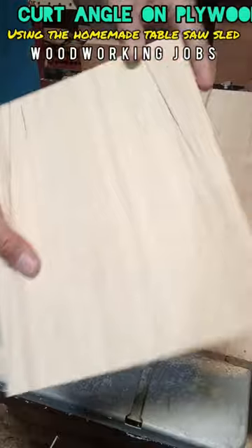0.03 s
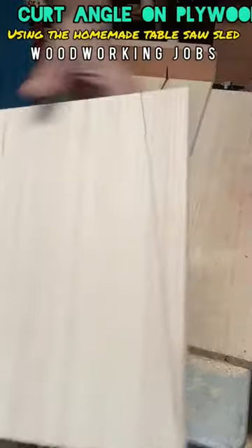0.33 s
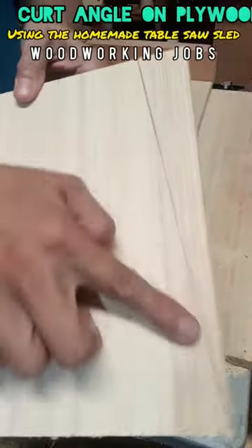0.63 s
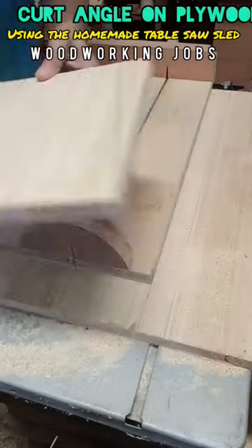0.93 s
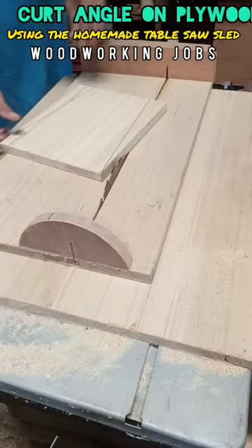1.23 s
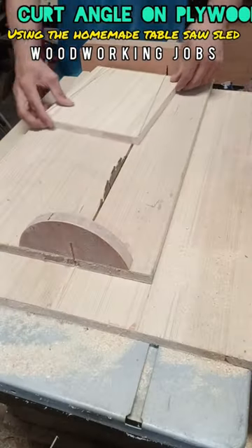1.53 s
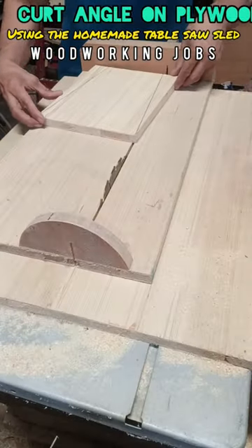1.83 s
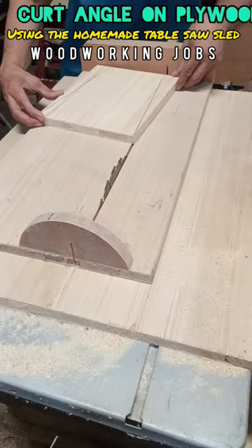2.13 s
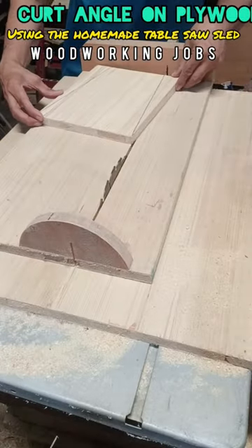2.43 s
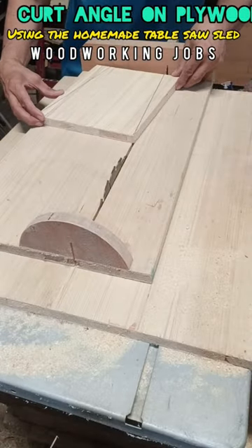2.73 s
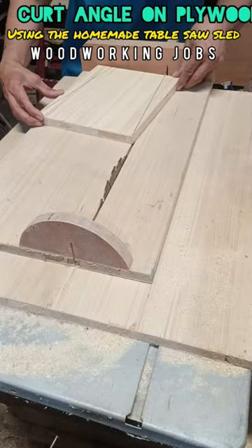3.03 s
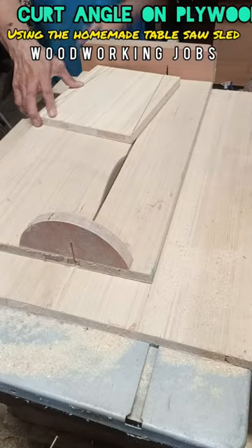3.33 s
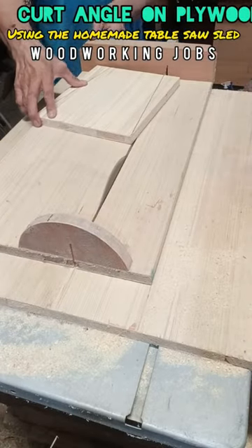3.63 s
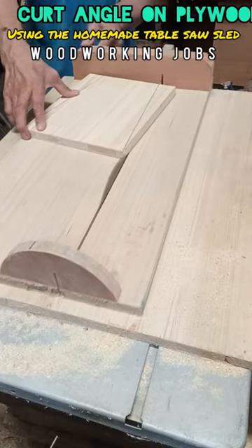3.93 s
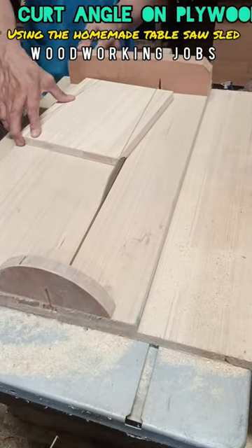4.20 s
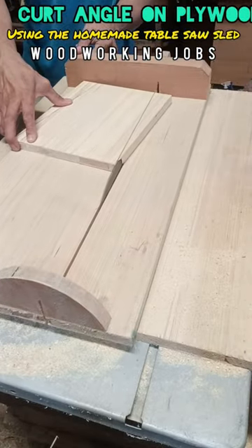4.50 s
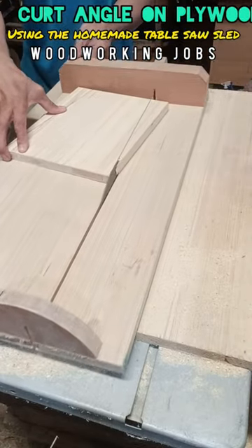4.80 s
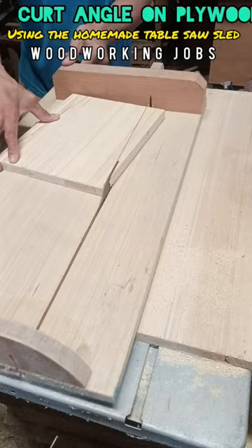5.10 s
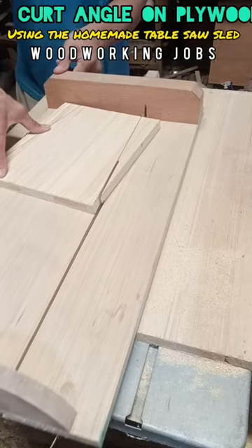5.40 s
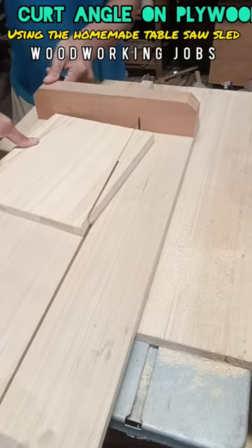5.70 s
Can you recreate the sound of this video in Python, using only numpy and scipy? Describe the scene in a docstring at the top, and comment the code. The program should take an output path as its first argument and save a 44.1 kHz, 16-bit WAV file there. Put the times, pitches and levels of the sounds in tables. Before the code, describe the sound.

A muffled engine hums beyond the walls of a small workshop as a board is laid down and slid about with quiet knocks, rubs and ticks. Then a table saw clicks on close to the microphone, much louder, with a rising whine and a rush of air. The teeth rasp and scream through the plywood, the steel blade rings, and the pitch sags slightly as the cut deepens.

```python
"""A table saw starts at 3.4 s in a small workshop and cuts a plywood board.
Fan and blade roar up to speed; the 24 teeth whine and rasp in the wood, the steel plate rings,
and the deepening cut slows the blade a little. Before that, the board is laid on the saw's wooden
sled and slid into place with knocks, rubs and ticks, while an engine outside drones away."""
import sys
import numpy as np
from scipy import signal
from scipy.fft import rfft, irfft, next_fast_len
from scipy.io import wavfile
from scipy.ndimage import map_coordinates

SR = 44100
rng = np.random.default_rng(int(sys.argv[2]) if len(sys.argv) > 2 else 0)


def file_out(sig):
    """Save sig as 16-bit WAV at sys.argv[1]."""
    # one column per channel
    cols = np.atleast_2d(sig).T
    # limit, then scale
    lim = np.clip(cols, -1, 1)
    pcm = np.round(lim * 32767).astype(np.int16)
    wavfile.write(sys.argv[1], SR, pcm)


N = 262395
TIME = np.arange(N) / SR
TEETH, FREE_TOOTH_HZ = 24, 1975.4
MOTOR_ON_S, SAG_FROM_S = 3.398, 4.71

# mid-band noise of sliding wood and still air: f/Hz, density/dB
MID_NOISE = [(250, -10), (450, 2), (700, -0.5), (1000, 2), (1400, 1.5), (2000, -3.5), (2700, -7.5),
             (3400, -12.5), (5000, -11.5), (7000, -28), (10000, -58)]
# treble hiss: f/Hz, density/dB
HISS = [(2350, -51), (4000, -2.5), (6740, -2.5), (8500, 3.5), (9790, -5.5), (10800, -10), (12600, -12),
        (15500, -15)]


def amp(db):
    """Decibels to gain."""
    return 10 ** (np.asarray(db) / 20)


def unit(x):
    """Scale to rms 1."""
    return x / np.sqrt(np.mean(x ** 2) + 1e-20)


def along(points, hz):
    """Interpolate (f/Hz, value) points on a log axis."""
    f, v = np.transpose(points)
    return np.interp(np.log(hz + 1), np.log(f + 1), v)


def curves(rows):
    """One value per sample for each column after t/s."""
    s, *cols = np.transpose(rows)
    return [np.interp(TIME, s, c) for c in cols]


def wobble(rate_hz):
    """Smooth random curve with knots at rate_hz."""
    return map_coordinates(rng.standard_normal(int(N * rate_hz / SR) + 4), [TIME * rate_hz])


def ramp(start_s, rise_s):
    """Linear rise from 0 to 1."""
    return np.clip((TIME - start_s) / rise_s, 0, 1)


def swell(centre_s, sigma_s):
    """Gaussian rise and fall."""
    return np.exp(-.5 * ((TIME - centre_s) / sigma_s) ** 2)


def filtered(x, response):
    """Apply a gain given as a function of frequency."""
    m = next_fast_len(N + 8192)
    return irfft(rfft(x, m) * response(np.fft.rfftfreq(m, 1 / SR)), m)[..., :N]


def rush(spectrum):
    """Stereo noise of rms 1, nearly mono in the bass."""
    # left-right likeness: f/Hz, correlation
    likeness = [(40, 0.54), (120, 1), (260, 0.86), (500, 0.77), (1000, 0.42), (2000, 0.014), (4000, 0.017),
                (8000, 0.4), (12000, 0.84)]

    def mid_side_gain(hz):
        angle = np.arccos(np.clip(along(likeness, hz), -1, 1)) / 2
        return amp(along(spectrum, hz)) * [np.cos(angle), np.sin(angle)]

    mid, side = filtered(rng.standard_normal((2, N)), mid_side_gain)
    return unit(np.array([mid + side, mid - side]))


def smear(phase, width_hz):
    """Narrow stereo noise of rms 1 riding on a pitch."""
    lowpass = signal.butter(2, width_hz / 2, fs=SR)
    a, b = signal.lfilter(*lowpass, rng.standard_normal((2, 2, N)))
    return unit(a * np.cos(phase) + b * np.sin(phase))


def tone(phase, waver_db, spread_rad, lead_rad=0):
    """Stereo sine of rms 1; reflections make level and phase wander on each side."""
    shared_db = waver_db * wobble(22)
    sides = [amp(shared_db + waver_db * wobble(6.5)) * np.sin(phase + shift + spread_rad * wobble(5.085))
             for shift in (lead_rad, 0)]
    return unit(np.array(sides))


def rough_tone(phase, share, lead_rad=0):
    """Tone with a share of its power scattered into narrow noise."""
    clean = tone(phase, waver_db=.8, spread_rad=.25, lead_rad=lead_rad)
    return np.sqrt(1 - share) * clean + np.sqrt(share) * smear(phase, width_hz=38)


def ambience():
    """Steady workshop rumble under faint, fading air and hiss."""
    # room rumble: f/Hz, density/dB
    room = [(20, -7), (32, -10), (45, 5), (70, -1), (130, 1), (250, -12.5), (600, -18.5), (2000, -89)]
    air = amp(-53.5 - 1.25 * TIME) * rush(MID_NOISE)
    hiss = amp(-66.5 - 2 * TIME) * rush(HISS)
    return air + hiss + amp(-50) * rush(room)


def engine(fade_db_per_s=7):
    """An engine drones through the walls and fades as it gathers speed."""
    # firing rate: t/s, f/Hz
    firing = [(0.1, 37.2), (0.8, 37.7), (1.5, 38.5), (2.3, 39.3), (2.6, 40), (2.8, 41.3), (3.05, 42),
              (3.4, 44.5)]
    # drone: multiple of firing rate, relative level/dB
    orders = [(4, -1), (6, 1.5), (7, -3), (8, -6), (9, -7), (10, -1), (11, -6.5)]
    # single orders booming in the room: t/s, sigma/s, multiple, level/dB
    room_booms = [(0.277, 0.15, 3, -34.5), (0.73, 0.085, 3, -35.5), (0.517, 0.07, 4, -45),
                  (0.888, 0.14, 4, -37), (1.346, 0.17, 6, -46), (0.992, 0.079, 8, -45),
                  (1.44, 0.15, 9, -47.5), (1.887, 0.06, 6, -46.5), (2.642, 0.083, 8, -50),
                  (2.95, 0.087, 7, -50.5), (3.0, 0.18, 4, -54)]
    # rumble through the walls: f/Hz, density/dB
    rumble = [(25, -39), (60, -13), (105, -8), (150, 1.5), (195, -7), (230, -9), (340, -6.5), (400, -12.5),
              (480, -21), (700, -24), (2000, -68)]
    firing_hz, = curves(firing)
    phase = 2 * np.pi * np.cumsum(firing_hz) / SR
    drone = sum(amp(db) * tone(k * phase + 0.54 * wobble(7.35), waver_db=3.5, spread_rad=0.086)
                for k, db in orders)
    booms = sum(amp(db) * swell(s, sigma) * np.sin(k * phase) for s, sigma, k, db in room_booms)
    return amp(-35 - fade_db_per_s * TIME) * (amp(0.5) * rush(rumble) + amp(-10) * drone) + booms


def rubbing():
    """Hands and board rub on the sled: low drag, woody scrape and hiss."""
    # strokes: t/s, sigma/s, drag/dB, scrape/dB, hiss/dB
    rubs = [(0.093, 0.12, -32.5, -50, -63), (0.54, 0.17, -52, -64, -74), (0.848, 0.026, -42, -66, -60),
            (1.5, 0.093, -44, -51.5, -64), (1.762, 0.12, -46, -51.5, -67.5)]
    # low drag: f/Hz, density/dB
    drag_spectrum = [(30, -39), (75, -13), (110, -4.5), (160, -1), (200, -15), (330, -6), (420, -18),
                     (520, -31), (2000, -78)]
    drag, scrape, hiss = rush(drag_spectrum), rush(MID_NOISE), rush(HISS)
    return sum(swell(s, sigma) * (amp(drag_db) * drag + amp(scrape_db) * scrape + amp(hiss_db) * hiss)
               for s, sigma, drag_db, scrape_db, hiss_db in rubs)


def sled_bumps(rise_s=0.0077):
    """Soft pushes set the sled's lowest mode swinging."""
    # pushes: t/s, gain/dB, f/Hz
    pushes = [(1.699, -20.5, 130), (1.741, -19.5, 120), (1.786, -18, 120), (2.07, -26, 112)]
    out = np.zeros(N)
    for s, db, hz in pushes:
        t = np.maximum(TIME - s, 0)
        out += amp(db) * (t / rise_s) ** 2 * np.exp(-t / rise_s) * np.sin(2 * np.pi * hz * t)
    return out


def ticks():
    """Tiny hard contacts of board and power switch: a tap with a short bright edge."""
    # contacts: t/s, relative level/dB, edge re tap/dB
    contacts = [(0.543, -27, -25), (2.196, -23.5, -7), (2.945, -36, -8), (3.399, -8.5, -22)]
    tap = rush([(400, -7), (1500, 2), (2400, -3), (3500, -12), (7000, -23), (15000, -38)])
    edge = rush([(7500, -30), (9700, 4), (11500, 2), (13000, -9), (15500, -12)])
    fade = lambda s, t60_s: amp(-60 * np.abs(TIME - s) / t60_s) * (TIME >= s)
    return sum(amp(db - 14.5) * (fade(s, 0.027) * tap + amp(edge_db) * fade(s, 0.016) * edge)
               for s, db, edge_db in contacts)


def board_landing(damping=2.15):
    """The hand-damped board lands edge by edge; each knock clatters and rings its modes."""
    # landings: t/s, relative level/dB, low-mode gain/dB, high-mode gain/dB, contact/s
    knocks = [(1.159, -21, -22, 11, 0.004), (1.166, -15.5, 5.5, -10, 0.00587),
              (1.209, -19.5, -17, -8, 0.0069), (1.221, -22, -14, 2, 0.007)]
    # board modes: f/Hz, relative level/dB, t60 before hand damping/s
    modes = [(222, 4, 0.092), (364, -13, 0.098), (724, -3, 0.078), (848, 2, 0.15), (1180, -11, 0.09),
             (1408, 1, 0.1), (1700, -20, 0.046), (2090, -19, 0.18), (2426, -26, 0.1), (3220, -30, 0.13)]
    # contact noise: f/Hz, density/dB
    clatter = [(300, -18), (600, 3), (800, 6), (1050, 1), (1450, 4), (2200, -4), (3000, -18.5),
               (5000, -26), (7000, -43), (12000, -49)]
    t, out = np.arange(SR // 4) / SR, np.zeros((2, N))
    for s, db, low_db, high_db, contact_s in knocks:
        ring = np.zeros((2, len(t)))
        for hz, mode_db, t60_s in modes:
            level_db = mode_db + low_db * (hz < 500) + high_db * (hz > 1300) - 60 * damping * t / t60_s
            ring += amp(level_db) * np.sin(2 * np.pi * hz * t + rng.normal(0, 0.94, (2, 1)))
        attack = 1 - np.exp(-t / 0.0068)
        start = round((s - contact_s / 2) * SR)
        out[:, start:start + len(t)] += amp(db + 4.5) * attack * ring
        out += amp(db - 7.5) * swell(s + contact_s / 2, contact_s) * rush(clatter)
    return out


def cabinet(shaft, bite_db):
    """The cabinet rumbles; imbalance shakes it at shaft orders 1 and 3."""
    # cabinet rumble: f/Hz, density/dB
    spectrum = [(20, -38), (45, -14), (78, -3), (115, -6), (165, -16.5), (205, -4.5), (235, 0), (300, -7),
                (450, -7), (580, -23), (1000, -34), (2000, -90)]
    rumble = amp(-29 + 0.49 * wobble(8)) * rush(spectrum)
    hum = sum(amp(db) * tone(k * shaft, waver_db=1.07, spread_rad=0.13)
              for k, db in [(1, -10.5), (3, -4.5)])
    return rumble + amp(-23.5 + 0.31 * bite_db) * hum


def motor(shaft, gear_ratio=4.55, rotor_slots=32):
    """The gears groan and the rotor slots whistle during run-up."""
    rotor = gear_ratio * shaft
    groan = amp(-27.5) * swell(3.53, 0.096) * tone(rotor, waver_db=1, spread_rad=0.11)
    whistle = amp(-41.5) * swell(3.62, 0.08) * smear(rotor_slots * rotor, width_hz=150)
    return groan + whistle


def fan(tooth_hz):
    """Fluttering air roar that grows with speed."""
    # roar: f/Hz, density/dB
    roar = [(350, -22), (560, -5), (850, 3), (1000, 2.5), (1300, 5), (1700, 6.5), (2100, 2.5), (2600, 0),
            (3300, -6), (4900, 1), (6200, -14.5), (8800, -6), (11000, -20.5), (15500, -22.5)]
    speed_db = 20 * np.log10(tooth_hz / FREE_TOOTH_HZ)
    flutter = unit(amp(1.33 * wobble(300) + 0.94 * wobble(70) + 0.24 * wobble(9)))
    return amp(-21.5 + 0.97 * speed_db) * flutter * rush(roar)


def rim_eddies(tooth_hz):
    """Eddies shed by the fast rim sing in a narrow band that climbs a little with speed."""
    eddy_hz = 1815 + 0.3 * (tooth_hz - FREE_TOOTH_HZ)
    phase = 2 * np.pi * np.cumsum(eddy_hz) / SR
    return amp(-23.5 + wobble(10)) * ramp(3.56, 0.27) * smear(phase, width_hz=113)


def board_shudders():
    """The teeth grab the board and briefly excite one resonance at a time."""
    # grabs: t/s, sigma/s, f/Hz, level/dB
    grabs = [(5.356, 0.059, 850, -35), (5.387, 0.07, 1260, -28.5), (5.523, 0.072, 1410, -34)]
    return sum(amp(db) * swell(s, sigma) * rough_tone(2 * np.pi * hz * TIME + 0.76 * wobble(60), 0.38)
               for s, sigma, hz, db in grabs)


def blade_plate(tooth_hz, bite_db, covered, low_hz=2506, high_hz=4420):
    """The steel plate rings as it catches, murmurs under load and sings higher once buried."""
    # catches in the kerf: t/s, level/dB
    catches = [(3.772, -26), (3.82, -31), (3.85, -29.5), (3.924, -22.5), (4.08, -27), (4.13, -29),
               (4.25, -24.5), (4.61, -27), (5.36, -30), (5.43, -29), (5.5, -24), (5.72, -30), (5.82, -31),
               (5.87, -32)]
    slack_hz = 0.98 * np.maximum(1873 - tooth_hz, 0)  # a slow plate is less stiff
    low_phase = 2 * np.pi * np.cumsum(low_hz - slack_hz) / SR
    jolts = sum(amp(db) * swell(s, 0.011) for s, db in catches)
    chatter = jolts * rough_tone(low_phase + 0.88 * wobble(220), share=0.35)
    murmur = amp(-35 + bite_db) * smear(low_phase, width_hz=90)
    flicker = unit(amp(6.9 * wobble(25)))
    sing = amp(-35) * covered * flicker * smear(2 * np.pi * high_hz * TIME, width_hz=65)
    return chatter + murmur + sing


def fibre_rasp(bite_db, covered):
    """Tearing fibres rasp, more thinly once the board covers the blade."""
    # tearing: f/Hz, density/dB
    spectrum = [(1000, -60), (2000, -25), (2700, 2.5), (3300, -3), (4100, 4), (4800, 4), (6500, -4.5),
                (7400, -3), (8500, 0.5), (10000, 1), (11500, -11), (12800, -3.5), (14300, -10), (15500, -5)]
    # colour of the covering board: f/Hz, gain/dB
    cover_colour = [(3000, -2.5), (4600, -2.5), (6500, 0.5), (9000, 1.5), (14000, 3.5)]
    tearing = rush(spectrum)
    thinned = filtered(tearing, lambda hz: amp(along(cover_colour, hz)))
    return amp(-19.5 + 0.94 * bite_db) * ramp(3.6, 0.27) * ((1 - covered) * tearing + covered * thinned)


def tooth_scream(shaft, bite_db):
    """High overtones; teeth strike slightly early or late, roughening the highest most."""
    # overtones: shaft order, clean/dB, smeared/dB, growth/(dB per dB of bite), drift/(dB/s)
    overtones = [(72, -30, -35, 0.6, 0), (96, -32, -37.5, 1.3, 4), (108, -31.5, -34.5, 1.3, -9),
                 (120, -29.5, -29.5, 0.95, -1), (144, -38.5, -39, 1.4, 2), (156, -36.5, -39.5, 1.4, -5),
                 (168, -35, -33, 1.6, 1), (180, -46, -44, 1.2, 3), (192, -36, -35, 1.3, 1)]
    jitter_rad = 0.003 * wobble(170) + 0.002 * np.sin(shaft)
    sag_s = np.maximum(TIME - SAG_FROM_S, 0)
    out = np.zeros((2, N))
    for k, clean_db, smeared_db, growth, drift_db_per_s in overtones:
        clean = amp(clean_db + 1) * tone(k * (shaft + jitter_rad), waver_db=3.5, spread_rad=0.64)
        smeared = amp(smeared_db - 0.5) * smear(k * shaft, width_hz=1.4 * k)
        out += amp(growth * bite_db + drift_db_per_s * sag_s) * (clean + smeared)
    return out


def tooth_whine(shaft, bite_db):
    """Tooth-rate tone and its octave: breathy in free air, firmer as the teeth bite."""
    # fundamental, shifting as the sled moves: t/s, left/dB, right/dB, left lead/rad
    fundamental = [(3.42, -28, -39, 0), (3.49, -21.5, -28, 0.5), (3.6, -33, -33, 2.5), (4.04, -47, -28, -3),
                   (4.17, -21.5, -25.5, 1.5), (4.27, -29, -18, -1), (4.32, -43, -25, 4),
                   (4.42, -19, -39, -5), (4.55, -21, -23, 0.2), (4.75, -19, -20, -0.9),
                   (4.9, -21.5, -17.5, 0), (5.01, -30, -21.5, -2), (5.13, -14.5, -28, -5),
                   (5.23, -23.5, -19.5, -6), (5.3, -30, -28, -3.5), (5.37, -28, -20, -6.5),
                   (5.57, -34, -31, -5.5), (5.67, -22, -31, -5), (5.8, -20.5, -43, -6.5),
                   (5.92, -19.5, -26, -4)]
    # surges of the octave: t/s, left/dB, right/dB
    surges = [(3.45, -49, -48), (3.69, -44, -45), (3.76, -35, -34), (3.83, -40, -41), (3.96, -30, -30),
              (4.04, -36, -33.5), (4.14, -20, -21), (4.2, -28, -35), (4.29, -20, -17), (4.4, -36, -35),
              (4.53, -18, -21), (4.62, -24, -22.5), (4.67, -28, -22.5), (4.73, -19, -30),
              (4.89, -20.5, -30), (4.95, -17, -18), (5.07, -23.5, -29), (5.19, -21, -25),
              (5.32, -20.5, -25), (5.42, -21, -41), (5.57, -25, -19), (5.66, -19, -17), (5.75, -23, -33),
              (5.84, -18, -21.5)]
    left_db, right_db, lead_rad = curves(fundamental)
    breathy = np.clip(-bite_db / 55, .03, .5)
    whine = amp([left_db, right_db]) * rough_tone(TEETH * shaft, breathy, lead_rad)
    octave = amp(curves(surges)) * rough_tone(2 * TEETH * shaft, breathy, lead_rad=1.62)
    return whine + octave


def tooth_rate(first_hz=1305, run_up_tau_s=0.372, sag_hz_per_s=131):
    """Teeth per second: the motor nears its free speed, then sags under the cut."""
    run_up = np.exp(-np.maximum(TIME - MOTOR_ON_S, 0) / run_up_tau_s)
    sag_hz = sag_hz_per_s * np.maximum(TIME - SAG_FROM_S, 0)
    return FREE_TOOTH_HZ - (FREE_TOOTH_HZ - first_hz) * run_up - sag_hz


def table_saw():
    """Shaft speed sets the pitch of teeth and motor; the bite sets the cutting noise."""
    # how hard the teeth bite: t/s, level/dB
    bite = [(3.4, -49), (3.85, -28), (3.98, -12.5), (4.3, -4.5), (4.8, -2.5), (5.45, -2), (5.56, -6),
            (5.63, -2.5), (5.9, -1)]
    bite_db, = curves(bite)
    tooth_hz = tooth_rate()
    shaft = 2 * np.pi * np.cumsum(tooth_hz / TEETH) / SR
    covered = ramp(5.45, 0.098)  # the board closes over the blade and muffles air and cabinet
    air_gain, cabinet_gain = amp(-5.5 * covered), amp(-5 * covered)
    # the blade runs slightly out of true, and fibres tear unevenly
    load = unit(amp(0.7 * np.sin(shaft) + 1.3 * wobble(300) + 0.7 * wobble(80)))
    machine = air_gain * fan(tooth_hz) + cabinet_gain * cabinet(shaft, bite_db) + motor(shaft)
    blade = air_gain * rim_eddies(tooth_hz) + blade_plate(tooth_hz, bite_db, covered)
    teeth = tooth_whine(shaft, bite_db) + tooth_scream(shaft, bite_db)
    wood = fibre_rasp(bite_db, covered) + board_shudders()
    running = ramp(MOTOR_ON_S + 0.0053, 0.0053)  # just after the switch clicks
    return running * (machine + load * (blade + teeth + wood))


def scene():
    """Engine outside and board handling, then the saw on top."""
    background = ramp(0.104, 0.0019) * (engine() + ambience() + rubbing())
    return background + board_landing() + sled_bumps() + ticks() + table_saw()


def record(dry, ceiling=0.9, top_hz=15550):
    """Each microphone port notches the treble; peaks are rounded and a steep low-pass ends the band."""
    # port responses: f/Hz, gain/dB
    left_port = [(300, 1.27), (1300, 0.5), (3500, 0), (5000, -8), (6100, -5.5), (6700, -12), (7600, -5),
                 (9200, 6.5), (10500, 5), (12000, 5.5), (13500, -0.5), (15200, -8)]
    right_port = [(300, 0.5), (1300, 2), (3500, 0.5), (5000, -2), (7000, 4.5), (8600, 0), (9500, -7.5),
                  (10200, -25), (11000, -11), (12000, 6), (15000, 4)]
    heard = filtered(dry, lambda hz: amp([along(left_port, hz), along(right_port, hz)]))
    rounded = heard / (1 + np.abs(heard / ceiling) ** 6) ** (1 / 6)
    return filtered(rounded, lambda hz: amp(-np.maximum(hz - top_hz, 0) ** 2 / 3000))


dry = scene()
out = record(dry)
file_out(out)
```